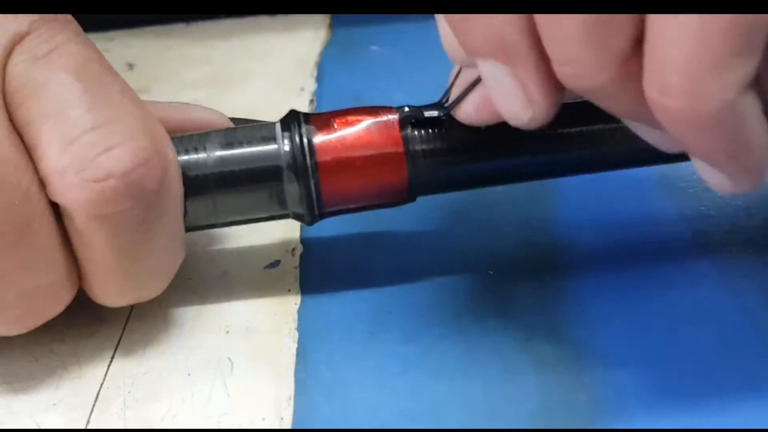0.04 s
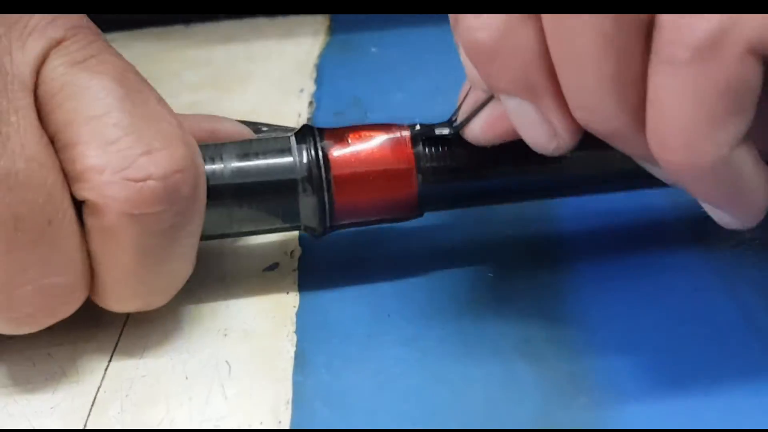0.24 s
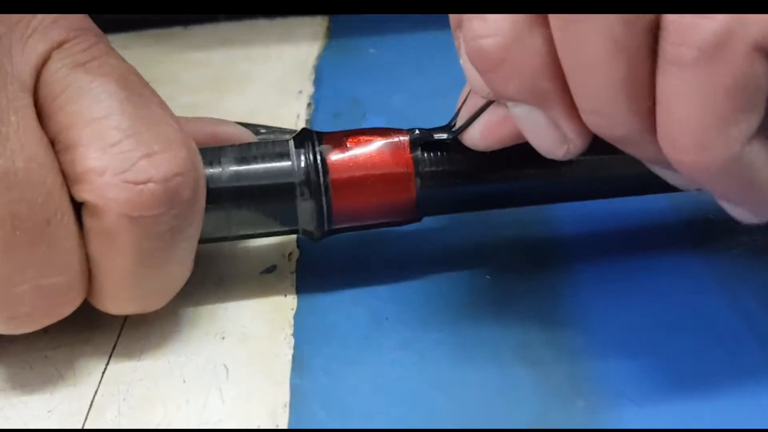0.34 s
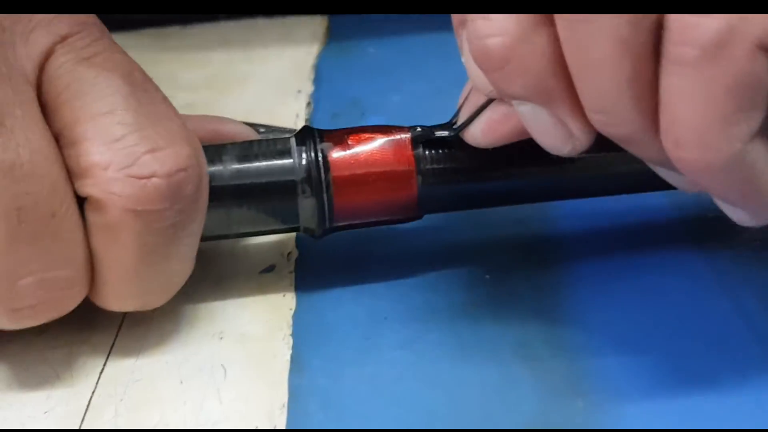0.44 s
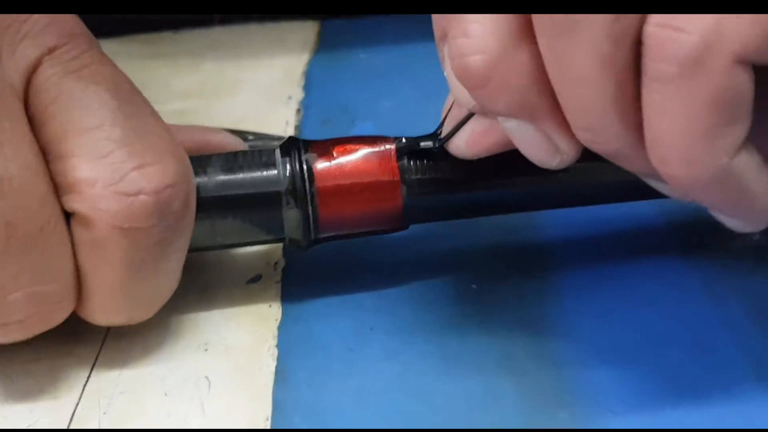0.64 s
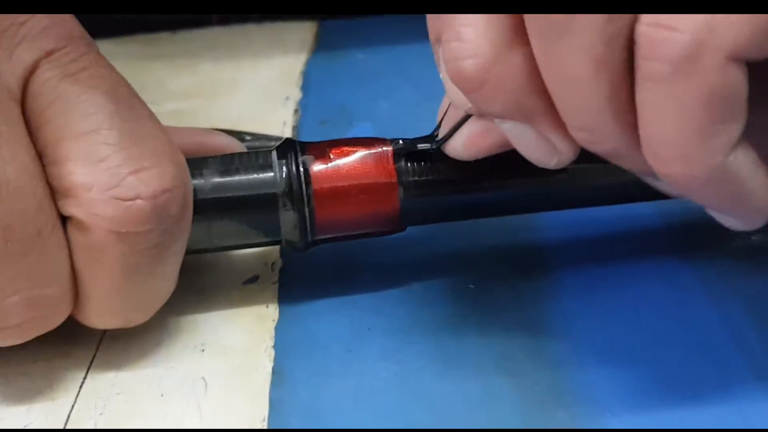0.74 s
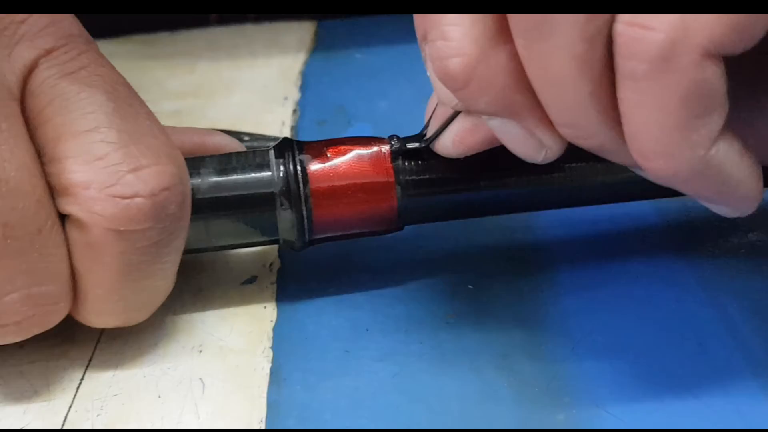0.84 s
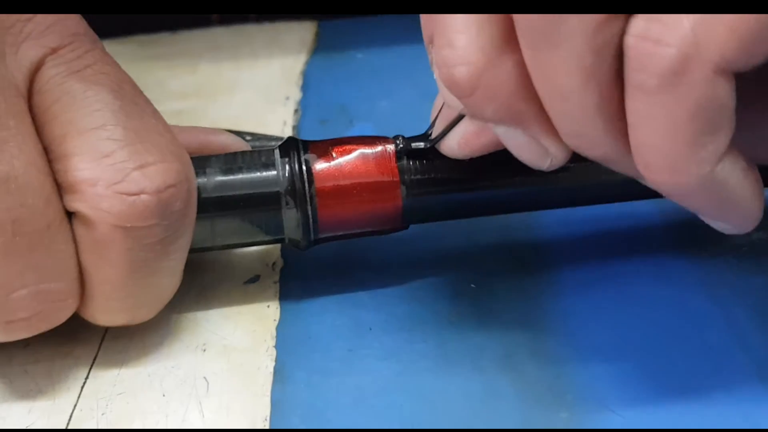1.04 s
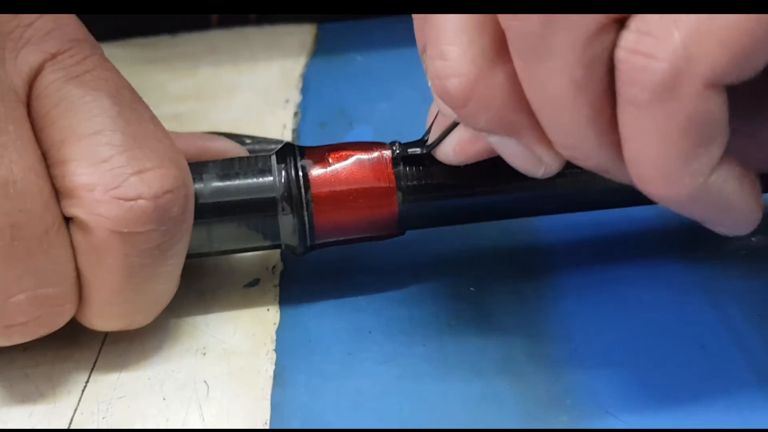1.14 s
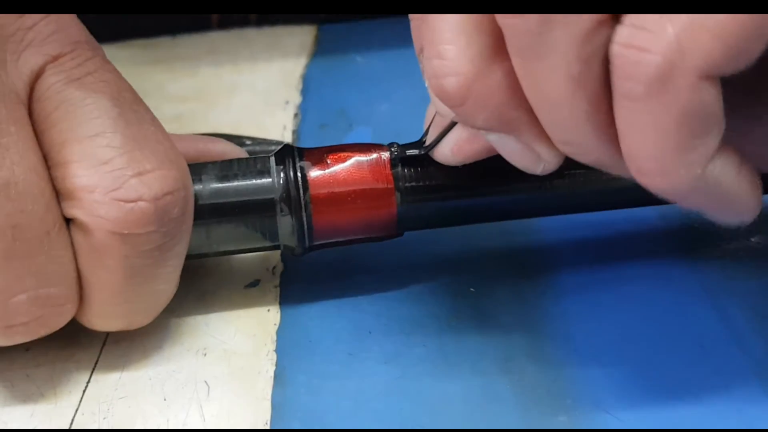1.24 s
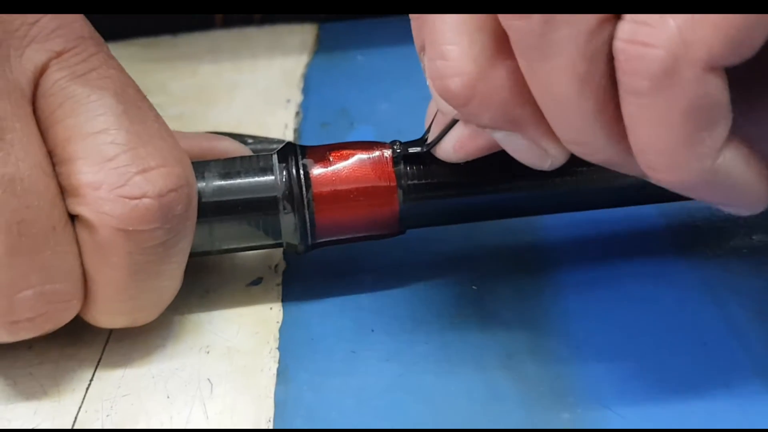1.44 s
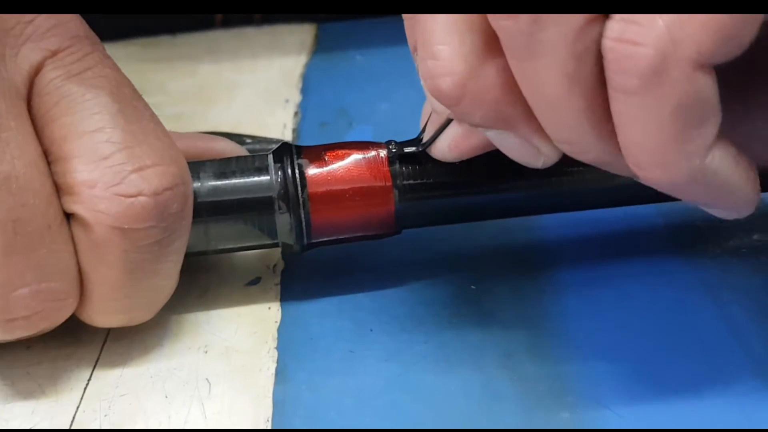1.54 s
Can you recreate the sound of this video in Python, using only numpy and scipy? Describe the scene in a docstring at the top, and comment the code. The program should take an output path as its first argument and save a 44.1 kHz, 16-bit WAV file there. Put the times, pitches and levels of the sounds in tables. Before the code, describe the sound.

A fishing rod knocks twice on a workbench, close by in a small room. After a soft hand slide, the first knock lands at about 0.25 seconds, followed by quick rattling and wire guide clicks until 0.4. The second comes at 0.8. From 1.0 to 1.2 the rod bumps softly and shudders with a low tone. Faint rubbing, finger rustle and light ticks continue until about 1.6 seconds.

```python
"""A fishing rod knocks twice on a workbench, close to the microphone in a small room.
Each impact excites damped modes of bench, rod tube and wire guide. After the first knock the rod
rattles and its guide clicks; after the second it rubs and shudders briefly in a low bending mode.
Friction gives the noise of a hand sliding along the rod at the start and of fingers that rustle
on it between light ticks. Knocks and ticks reverberate over a faint room noise."""
import sys
import numpy as np
from scipy import signal
from scipy.fft import rfft, irfft, next_fast_len
from scipy.io import wavfile
from scipy.ndimage import map_coordinates

SR = 44100
rng = np.random.default_rng(int(sys.argv[2]) if len(sys.argv) > 2 else 0)


def materialize(psi):
    """Save the field psi as 16-bit PCM at rate SR to the path in sys.argv[1].

    A 1-D psi becomes a single channel; in a 2-D psi each row is a channel.
    """
    bounded = np.clip(np.atleast_2d(psi).T, -1, 1)
    quanta = np.round(bounded * 32767).astype(np.int16)
    wavfile.write(sys.argv[1], SR, quanta)


N = 70560
T = np.arange(N) / SR
RING_T = np.arange(SR * 9 // 20) / SR  # time axis of one free decay

# All levels are relative.
# impacts of rod, guide and bench: t/s, then level/dB of bench boom, thump, knock, clack, click
IMPACTS = [(0.2265, -46, -2, -4.5, -26, -49.5), (0.2640, -21.5, -19, -12, -22, -28.5),
           (0.2745, -51, -19, -43, -26, -44), (0.2857, -35, -25, -49, -22, -47),
           (0.2935, -58, -20, -28, -38, -39), (0.3065, -36, -14.5, -52, -32, -37),
           (0.3222, -51, -18.5, -21, -24.5, -26.5), (0.3410, -44, -27.5, -26, -25.5, -48),
           (0.3462, -37, -27, -23.5, -30.5, -41), (0.3520, -38, -14.5, -26, -40, -52),
           (0.7968, -23, -16, -14, -27.5, -34), (0.8027, -42, -23.5, -25, -48, -35),
           (0.8180, -44, -31, -26.5, -36, -54), (0.8355, -39, -58, -63, -39.5, -41),
           (0.961, -44, -28, -37, -61, -62), (0.9740, -55, -34, -51, -54, -66),
           (1.017, -43, -24.5, -35, -46, -62), (1.0515, -40, -24, -33.5, -56, -67),
           (1.088, -61, -33, -49, -47, -64), (1.356, -40, -38, -53, -55, -63)]
# finger ticks on the guide: t/s, level/dB
FINGER_TICKS = [(0.2826, -36), (0.366, -34.5), (0.5477, -52), (0.6164, -60), (0.6316, -71), (0.6642, -56),
                (0.6802, -45.5), (0.928, -52), (1.0280, -42), (1.1995, -57), (1.2634, -53.5), (1.3693, -49)]
# normal modes, lowest group first: f/Hz, level/dB, T60/s
BOOM_MODES = [(63.2, -6, 0.47), (86.3, -9.5, 0.37)]
THUMP_MODES = [(121.7, -2.5, 0.12), (176.2, -1.5, 0.12), (288.2, -7, .1)]
KNOCK_MODES = [(397.5, 9.5, 0.099), (488.6, 2.5, 0.23), (556, -7, 0.31), (690.4, -6.5, 0.11),
               (805, -12, 0.16), (876, -16, 0.16), (963, -13, 0.22), (1092, -16, 0.62), (1177, -11, 0.12),
               (1394, -22.5, 0.15), (1569, -17.5, 0.22)]
CLACK_MODES = [(1955, -1.5, 0.14), (2067, 3, 0.09), (2197, 2, 0.089), (2583, -13.5, 0.076),
               (2850, -8, 0.17), (3780, -15, 0.2), (3823, -16, .24)]
# spectra of dense, short-lived modes: f/Hz, level/dB
KNOCK_SPECTRUM = [(60, -32.5), (200, 5), (400, 2.5), (700, -4), (1100, -12.5), (1600, -19.5), (2500, -51),
                  (5000, -59), (15000, -59)]
CLACK_SPECTRUM = [(300, -9.5), (900, -2), (1400, 3.5), (1780, -22.5), (2150, -2.5), (2480, -22), (2900, -8),
                  (3600, -27), (4600, -18), (7000, -42), (15000, -40.5)]
CLICK_SPECTRUM = [(500, 14), (2500, 7), (4700, -1.5), (6100, -1), (7600, 3), (9000, -7), (12500, -7),
                  (15500, -28)]
CRACK_SPECTRUM = [(300, -25), (1200, 6), (2000, 3.5), (3300, -11), (4200, -17.5), (6500, -40), (15000, -42)]  # first instant of contact
# envelopes of the rod's bending, sliding hand, rubbing rod and rustling fingers: t/s, level/dB
SHUDDER_ENVELOPE = [(0.90, -77), (0.96, -27), (0.995, -33.5), (1.017, -19.5), (1.04, -26.5), (1.07, -24),
                    (1.105, -47.5), (1.132, -28), (1.17, -50), (1.25, -63)]
SLIDE_ENVELOPE = [(0, -46), (0.06, -45.5), (0.11, -47), (0.145, -47.5), (0.17, -54), (0.22, -53)]
RUB_ENVELOPE = [(0.5, -53), (0.75, -60.5), (0.86, -51), (0.93, -48.5), (0.97, -39), (1.04, -41),
                (1.09, -39.5), (1.14, -49.5), (1.19, -44), (1.225, -52.5), (1.27, -45), (1.32, -49),
                (1.37, -49), (1.43, -66.5), (1.48, -50), (1.53, -48), (1.6, -49)]
RUSTLE_ENVELOPE = [(0.45, -57), (0.55, -58), (0.595, -81.5), (0.615, -58), (0.76, -58), (0.88, -67),
                   (1.0, -62), (1.08, -56), (1.12, -71), (1.235, -47), (1.29, -58), (1.335, -61),
                   (1.45, -84), (1.6, -77)]
# spectra of the three friction noises: f/Hz, level/dB
SLIDE_SPECTRUM = [(88, -58), (150, -3), (269, -0.5), (388, -4), (420, -8), (607, -8.5), (696, -11.5),
                  (1180, -7.5), (1870, -19.5), (2320, -16), (2820, -25.5), (3230, -20.5), (9390, -38.5),
                  (13100, -36), (15600, -51)]
RUB_SPECTRUM = [(25, -4.5), (45, 3), (90, 2), (140, 3.5), (180, 3), (320, -2.5), (480, -9), (600, -11),
                (1100, -21), (1600, -27), (2500, -31), (2800, -40.5), (5000, -68), (9000, -86)]
RUSTLE_SPECTRUM = [(1500, 12.5), (3500, -7), (7000, -0.5), (10000, -13), (13000, -8.5), (15500, -17)]
# reverberation time of the room: f/Hz, T60/s
REVERB_TIME = [(80, 0.96), (200, 0.44), (1000, 0.41), (4000, 0.35), (12000, 0.51)]
# spectra of the reverberant tail and of the room's background noise: f/Hz, level/dB
REVERB_SPECTRUM = [(60, -11.5), (180, -4), (500, -10.5), (2000, -7.5), (6000, -3.5), (14000, -4.5)]
AIR_SPECTRUM = [(15, -29), (25, -9), (80, 1.5), (193, -10), (240, -15), (483, -14.5), (583, -19.5),
                (1050, -27.5), (1340, -25), (2360, -38), (2780, -45), (9580, -42), (15600, -64)]


def rod_knocks(push_s=0.001936):
    """Impact excitation: each contact rings bench, rod tube and guide in its own proportion."""
    out = np.zeros(N)
    phase = np.pi * np.minimum(RING_T / push_s, 1)
    for s, boom_db, thump_db, knock_db, clack_db, click_db in IMPACTS:
        boom = amp(boom_db) * ring(BOOM_MODES, attack_s=0.002, scatter_db=3)
        thump = amp(thump_db) * ring(THUMP_MODES, attack_s=0.00055, scatter_db=0.06)
        knock_ring = amp(-5.5) * ring(KNOCK_MODES, attack_s=0.00027, scatter_db=3)
        knock_burst = amp(-2.5) * burst(KNOCK_SPECTRUM, t60=0.074, attack_s=0.00036)
        knock = amp(knock_db) * (knock_ring + knock_burst)
        crack = amp(5.5) * burst(CRACK_SPECTRUM, t60=0.0077, attack_s=0.00045)
        clack_ring = amp(-13) * ring(CLACK_MODES, attack_s=0.0004, scatter_db=3)
        clack_burst = amp(-1) * burst(CLACK_SPECTRUM, t60=0.027, attack_s=0.00024)
        clack = amp(clack_db) * (crack + clack_ring + clack_burst)
        click = amp(click_db) * burst(CLICK_SPECTRUM, t60=0.018, attack_s=0.00039)
        push = amp(knock_db + 4) * np.sin(phase) * np.sin(2 * phase)  # contact pushes, then releases
        add(out, s, reverberate(boom + thump + push + knock + clack + click))
    return out


def rod_shudder(mode_hz=196, drift_rad=0.39):
    """Flexural vibration: the dragged rod hums in a low bending mode whose phase wanders."""
    return envelope(SHUDDER_ENVELOPE) * np.sin(2 * np.pi * mode_hz * T + drift_rad * wobble(34.5))


def handling():
    """Sliding friction: the hand slides on the rod, the rod rubs the bench and fingers rustle."""
    slide = envelope(SLIDE_ENVELOPE) * friction(SLIDE_SPECTRUM, grain_db=1.4, grains_per_s=200)
    rub = envelope(RUB_ENVELOPE) * friction(RUB_SPECTRUM, grain_db=2.5, grains_per_s=89.9)
    rustle = envelope(RUSTLE_ENVELOPE) * friction(RUSTLE_SPECTRUM, grain_db=5, grains_per_s=350)
    return amp(3) * slide + amp(4) * rub + amp(-3) * rustle


def finger_ticks():
    """Impulse response: fingers catch lightly on the wire guide, whose ringing dies at once."""
    out = np.zeros(N)
    for s, db in FINGER_TICKS:
        add(out, s, amp(db) * burst(CLICK_SPECTRUM, t60=0.01, attack_s=0.00024))
    return reverberate(out)


def reverberate(sound, build_s=0.01):
    """Reverberation: a diffuse tail follows the direct sound and lasts longest in the bass."""
    hz, t, white = signal.stft(rng.standard_normal(len(RING_T)), SR, nperseg=256)
    t60 = along(REVERB_TIME, hz)[:, None]
    decay = amp(along(REVERB_SPECTRUM, hz)[:, None] - 60 * t / t60)
    energy_norm = np.sqrt(2 * np.log(1000) / (t60 * SR))  # offsets the energy of a longer decay
    tail = signal.istft(white * decay * energy_norm, SR, nperseg=256)[1][:len(RING_T)]
    return sound + signal.fftconvolve(sound, tail * onset(build_s))[:len(sound)]


def room_air():
    """Stationary noise: the faint background of the room, strongest in the bass."""
    return amp(-48) * noise(AIR_SPECTRUM)


def ring(modes, attack_s, scatter_db):
    """Modal superposition: damped sinusoids whose levels vary from strike to strike."""
    hz, db, t60 = np.transpose(modes)[:, :, None]
    polarity = (-1) ** np.arange(len(modes))[:, None]
    decay = amp(db + scatter_db * rng.standard_normal(hz.shape) - 60 * RING_T / t60)
    partials = polarity * decay * np.sin(2 * np.pi * hz * RING_T)
    return partials.sum(0) * onset(attack_s) / np.linalg.norm(amp(db))


def burst(spectrum, t60, attack_s):
    """Modal overlap: many close modes merge into exponentially decaying noise."""
    return noise(spectrum, size=len(RING_T)) * amp(-60 * RING_T / t60) * onset(attack_s)


def friction(spectrum, grain_db, grains_per_s):
    """Amplitude modulation: uneven friction gives a grainy noise, here of rms 1."""
    return unit(noise(spectrum) * amp(grain_db * wobble(grains_per_s)))


def noise(spectrum, size=N):
    """Spectral shaping: white noise coloured and scaled to rms 1."""
    return unit(filtered(rng.standard_normal(size), lambda hz: amp(along(spectrum, hz))))


def filtered(x, response):
    """Linear filtering: the spectrum of x times a frequency response."""
    size = next_fast_len(len(x) + 8192)
    return irfft(rfft(x, size) * response(np.fft.rfftfreq(size, 1 / SR)), size)[:len(x)]


def envelope(rows, fade_db_per_s=400):
    """Amplitude envelope of a (t/s, level/dB) curve, decaying outside its span."""
    s, db = np.transpose(rows)
    outside_s = np.abs(T - np.clip(T, s[0], s[-1]))
    return amp(np.interp(T, s, db) - fade_db_per_s * outside_s)


def onset(rise_s):
    """Exponential rise from 0 towards 1."""
    return 1 - np.exp(-RING_T / rise_s)


def wobble(knots_per_s):
    """Smooth random fluctuation by spline interpolation."""
    return map_coordinates(rng.standard_normal(int(N * knots_per_s / SR) + 4), [T * knots_per_s])


def along(points, hz):
    """Interpolation of (f/Hz, value) points on a logarithmic frequency axis."""
    knots_hz, values = np.transpose(points)
    return np.interp(np.log(hz + 1), np.log(knots_hz + 1), values)


def add(track, s, sound):
    """Superposition of a sound on the track at time s."""
    part = track[round(s * SR):][:len(sound)]
    part += sound[:len(part)]


def amp(db):
    """Amplitude ratio of a level in decibels."""
    return 10 ** (np.asarray(db) / 20)


def unit(x):
    """Normalisation to rms 1."""
    return x / np.sqrt(np.mean(x ** 2) + 1e-20)


def scene():
    """Superposition: the sounds of rod and hand add to the room's background in one channel."""
    return (rod_knocks() + finger_ticks() + handling() + amp(-1.5) * rod_shudder() + room_air())[None]


def record(dry, low_cut_hz=25, top_hz=15750, ceiling=0.95):
    """Band limiting and saturation: the spectrum's ends drop away and high peaks are rounded off."""
    x = signal.sosfilt(signal.butter(2, low_cut_hz, "high", fs=SR, output="sos"), dry[0])
    rounded = x / (1 + np.abs(x / ceiling) ** 6) ** (1 / 6)
    return filtered(rounded, lambda hz: hz < top_hz)[None]


dry = scene()
out = record(dry)
materialize(out)
```